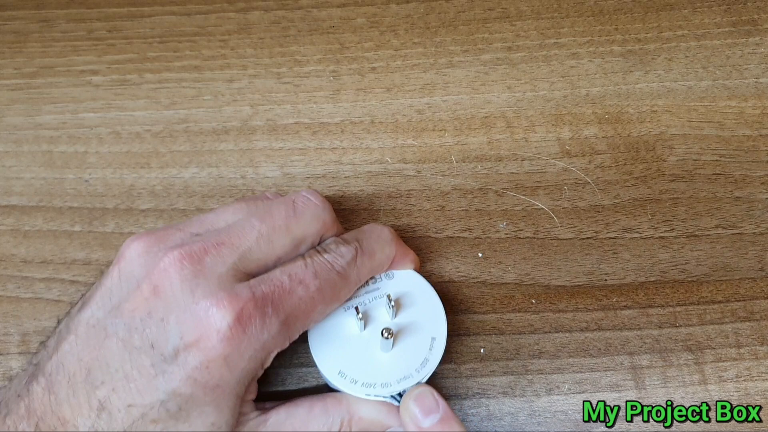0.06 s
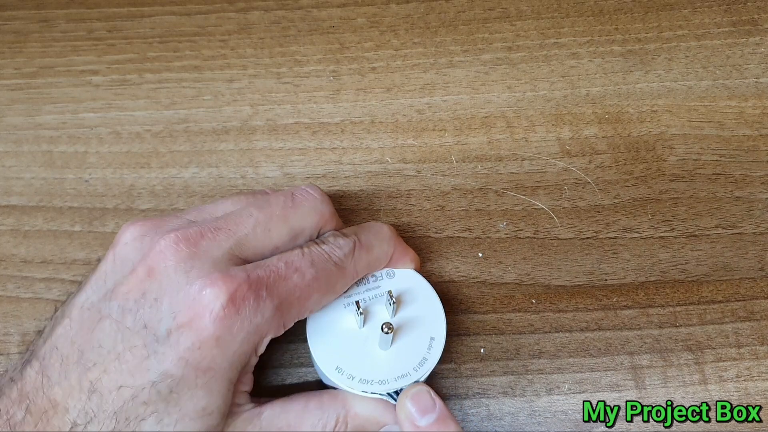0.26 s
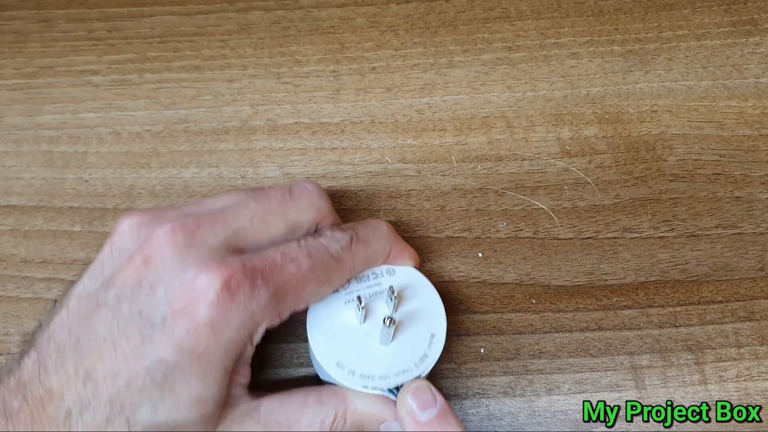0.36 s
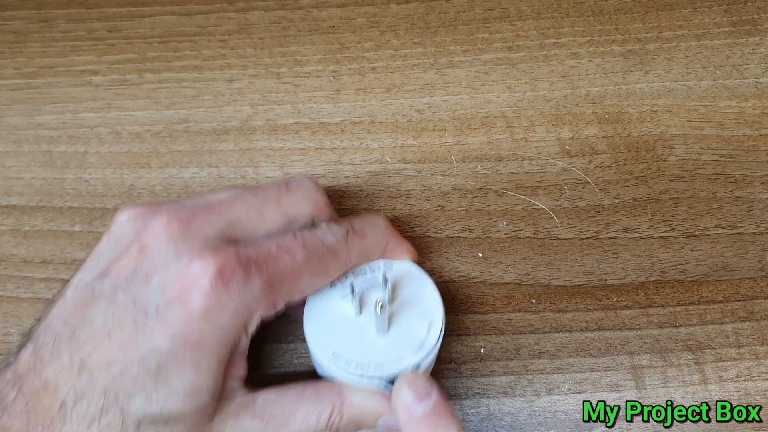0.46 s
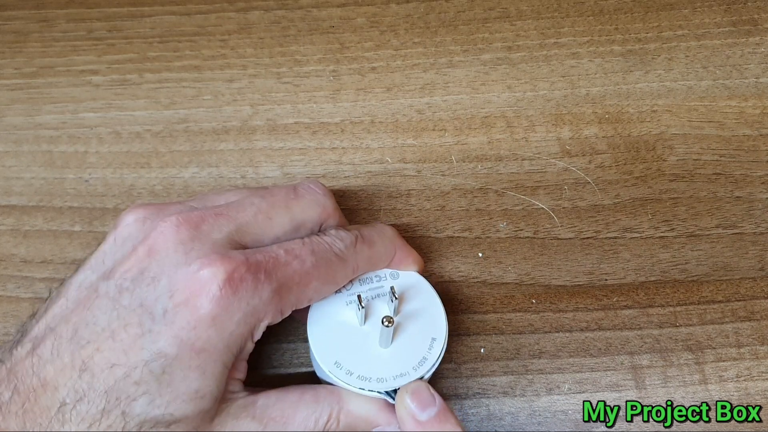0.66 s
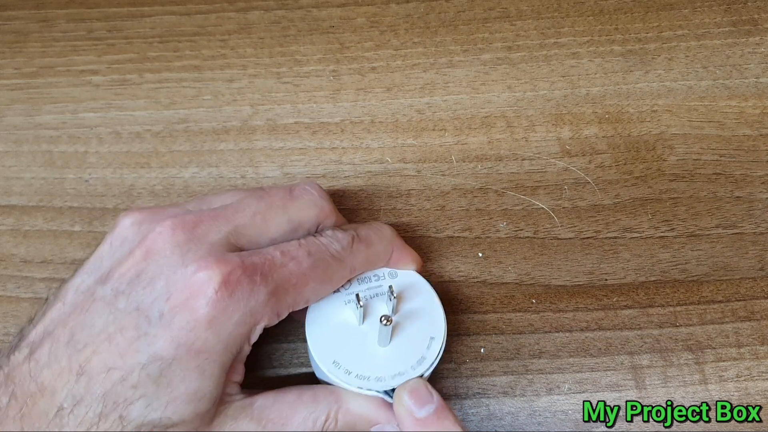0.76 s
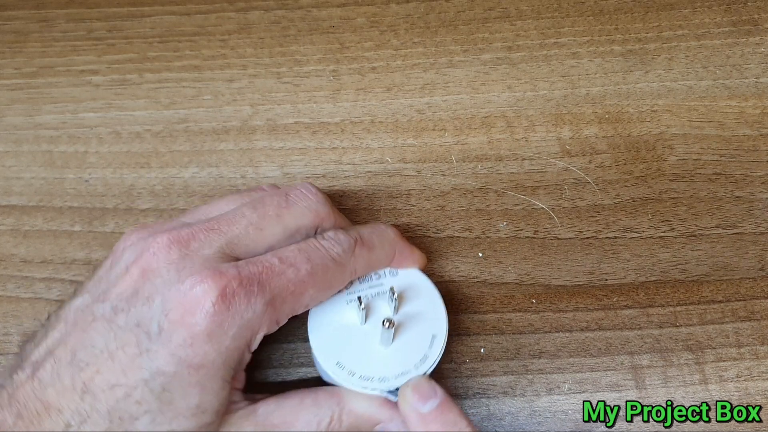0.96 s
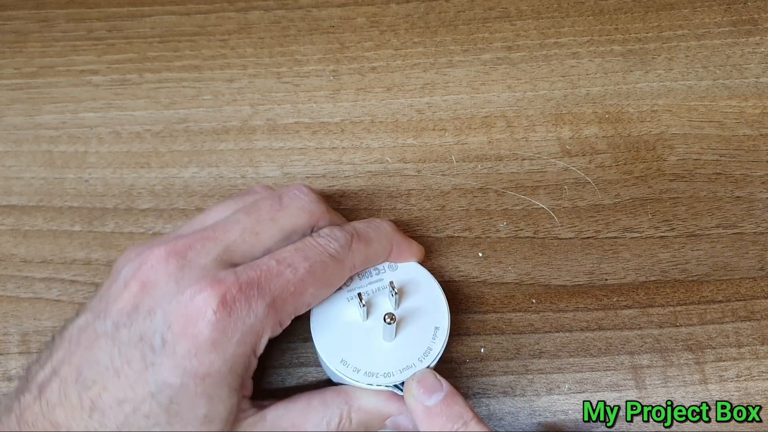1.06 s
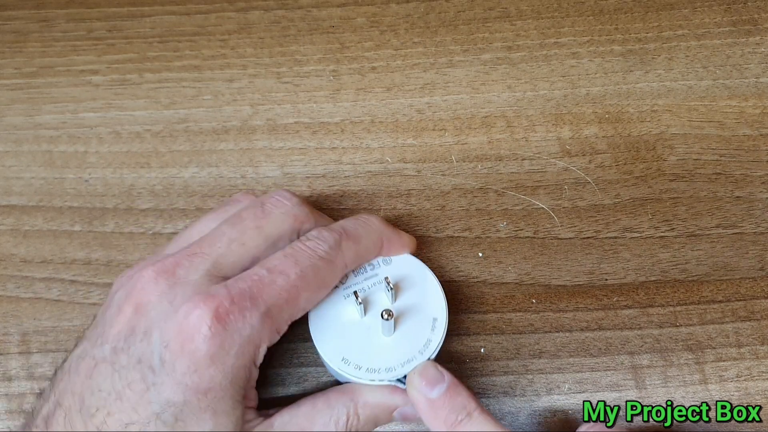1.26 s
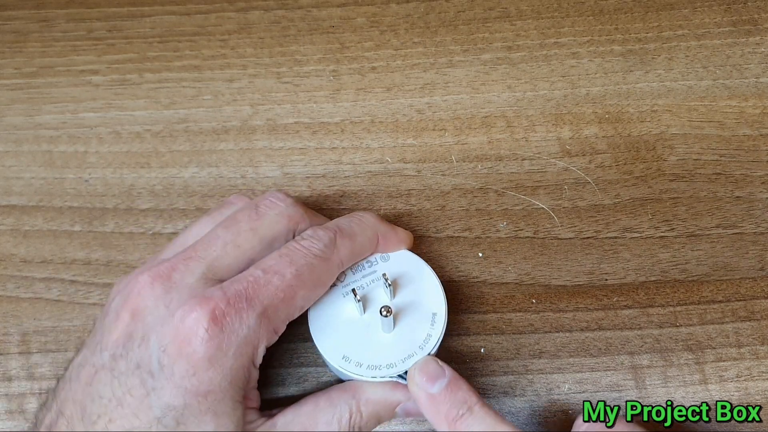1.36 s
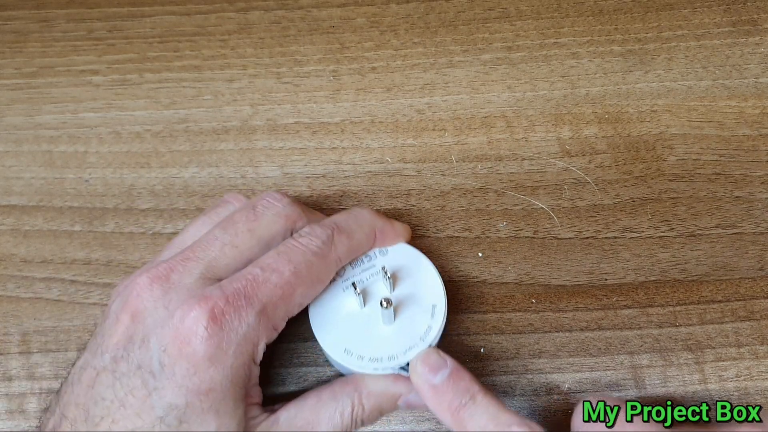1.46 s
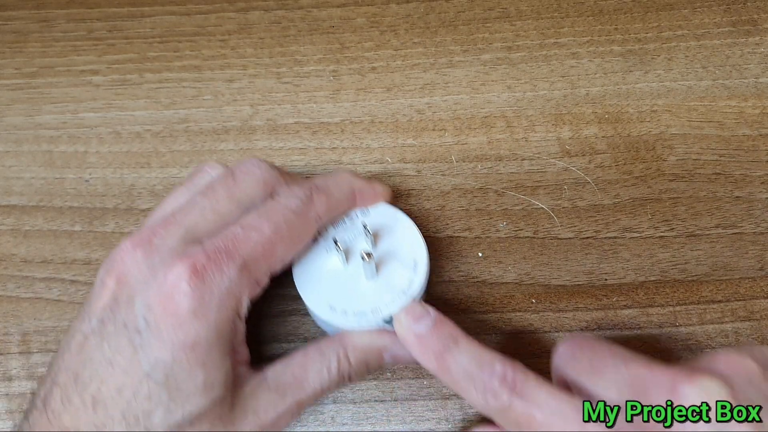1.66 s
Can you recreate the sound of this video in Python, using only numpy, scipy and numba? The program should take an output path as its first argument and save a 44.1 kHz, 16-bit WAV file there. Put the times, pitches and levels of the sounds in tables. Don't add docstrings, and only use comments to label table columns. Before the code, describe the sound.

Plastic clips snap loose with two loud, nearly merged cracks, followed by faint bumps and sliding on a table

```python
import sys
import numpy as np
from scipy import signal
from scipy.fft import rfft, irfft, next_fast_len
from scipy.io import wavfile
from scipy.ndimage import map_coordinates
from numba import njit

SR = 44100
rng = np.random.default_rng(int(sys.argv[2]) if len(sys.argv) > 2 else 0)


def amplitude_ratio(level_db):
    exponent = np.asarray(level_db, float) / 20
    return 10 ** exponent


def file_out(sig):
    cols = np.atleast_2d(sig).T
    lim = np.clip(cols, -1, 1)
    pcm = np.round(lim * 32767).astype(np.int16)
    wavfile.write(sys.argv[1], SR, pcm)


N = 74970
LEAD = SR // 2
M = N + LEAD

# start_s, peak_db, t60_s (time to fall 60 dB), shell_push_db
CRACKS = [
    (0.2028, -7.5, 0.0069, -14.5),
    (0.2184, -3.5, 0.0072, 2.5),
]
# pitch_hz, level_db (per Hz)
CRACK_COLOUR = [(180, -38.5), (320, 2.5), (550, -5.5), (900, 0), (1300, -1), (1800, -8), (4000, -2),
                (6410, -2.5), (10000, -8), (11500, -2.5), (16000, -26.5)]
# pitch_hz, width_hz, level_db
SHELL_MODES = [(152.7, 17, 2), (488, 34, -11.5), (599, 38, -0.5), (929, 13, 1), (1270, 30, -31.5),
               (1400, 54, -3)]
# pitch_hz, level_db, t60_s
TABLE_THUMP = [(42, -40, .5), (60, -38, .5), (155, -28, .16)]
# pitch_hz, level_db
EARLIER_COLOUR = [(100, -14), (600, -8), (1500, -5), (4000, -3.5), (9000, 3.5), (16000, -3.5)]
# start_s, peak_db, centre_hz, hardness_hz (dull above), rise_s
KNOCKS = [(0.121, -42.5, 168, 499, 0.012), (.464, -45, 190, 1400, 0.0027),
          (0.667, -58.5, 2555, 4600, .0003), (.672, -49, 300, 700, 0.0019), (.684, -59, 710, 1510, 0.0032),
          (0.6993, -35.5, 950, 3130, 0.00044), (.701, -40.5, 400, 810, .002),
          (0.713, -43.5, 420, 780, 0.0041), (0.718, -60, 1500, 2600, 0.00076),
          (0.771, -50.5, 1060, 3000, 0.00032), (.793, -65.5, 1150, 1800, .001),
          (0.831, -51, 237, 1010, 0.0011), (1.2015, -46.5, 650, 2000, .0005),
          (1.202, -36, 546, 935, 0.0035), (1.2023, -43, 200, 406, 0.0019), (1.217, -43, 462, 866, 0.0017),
          (1.24, -56.5, 603, 890, 0.0023), (1.338, -51, 830, 2529, 0.00082), (1.563, -46, 1100, 2766, .001),
          (1.569, -45.5, 728, 1800, 0.0024), (1.583, -56.5, 610, 1700, 0.0026),
          (1.599, -53.5, 720, 1820, 0.0016), (1.622, -58, 700, 1800, 0.0027)]
# pitch_hz, level_db, t60_s
CASE_MODES = [(160, -3, .09), (210, 1, 0.06), (320, -5, 0.05), (400, 0, 0.08), (470, -1, .07),
              (550, 1, 0.065), (640, -1, 0.05), (750, -3, .04), (960, 1, 0.022), (1180, -3, .02),
              (1420, -2, 0.028), (1980, -6, .022), (2500, -8, .016), (3200, -8, .015)]
# start_s, peak_db, pitch_hz
TICKS = [
    (.187, -50, 10000),
    (1.339, -47, 6700),
    (1.66, -59, 7950),
    (1.6612, -60, 11500),
    (1.664, -48, 12100),
    (1.6658, -58, 12400),
    (1.668, -51, 10140),
    (1.681, -61, 12650),
    (1.688, -70.5, 11000),
]
# time_s, level_db
DRAG_PRESSURE = [(1.05, -89.5), (1.12, -70), (1.25, -72), (1.33, -57.5), (1.368, -52), (1.421, -58.5),
                 (1.502, -72.5), (1.58, -58), (1.64, -63.5), (1.7, -66.5)]
# pitch_hz, level_db (per Hz)
DRAG_COLOUR = [(120, -26), (200, -6.5), (300, -11), (540, -3), (800, -7.5), (1400, -16), (1700, -26.5),
               (4000, -48)]
# time_s, level_db
PALM_PRESSURE = [(.64, -100), (.67, -74), (.8, -74), (1.08, -71), (1.28, -69), (1.38, -66), (1.48, -68.5),
                 (1.7, -71)]
# pitch_hz, level_db (per Hz)
PALM_COLOUR = [(150, -30), (300, -3), (700, -6), (1300, -4), (2000, -9), (3500, -15), (5000, -27),
               (8000, -50)]
# pitch_hz, level_db (per Hz)
FIZZ_COLOUR = [(2500, -18), (4500, -3.5), (7000, -5), (12000, -14.5), (15000, -34)]
SKID_LEVEL = [(1.657, -110), (1.661, -59), (1.669, -65), (1.676, -78), (1.7, -94)]
# pitch_hz, level_db (per Hz)
BLADE_COLOUR = [(4000, -42.5), (6500, -12), (10000, -4.5), (12500, 2), (14500, -8), (16000, -23)]
# pitch_hz, t60_s
ROOM_T60 = [(150, 0.35), (500, 0.27), (1200, 0.28), (3000, 0.31), (6000, 0.25), (12000, 0.25)]
# pitch_hz, level_db
ROOM_COLOUR = [(100, -3.5), (1000, 8.5), (4000, 2), (12000, 0.5)]
# pitch_hz, likeness (1 = the same, 0 = unrelated)
ALIKE = [(100, .97), (300, 0.95), (600, 0.65), (1100, 0.1), (2500, -.1), (10000, 0)]
# time_s, rumble_db
HAND_WEIGHT = [(0.0, -59), (0.052, -56.5), (0.188, -60.5), (0.222, -40), (0.41, -57), (0.43, -64.5),
               (0.776, -54.5), (0.814, -63), (0.87, -54.5), (1.026, -68), (1.116, -56.5), (1.154, -61.5),
               (1.528, -58), (1.7, -67.5)]
# pitch_hz, level_db (per Hz)
RUMBLE_COLOUR = [(12, -65.5), (20, -24.5), (70, -10), (114, -22.5), (130, -26), (211, -26.5), (500, -41),
                 (650, -67), (1100, -120)]
# pitch_hz, level_db (per Hz)
HISS_COLOUR = [(250, -40), (400, -5), (1000, -11), (4000, -20), (14000, -30), (16000, -32)]


def noise():
    return rng.standard_normal((2, M))


def unit(x):
    return x / np.sqrt(np.mean(x ** 2) + 1e-20)


def along(points, hz):
    f, v = np.transpose(points)
    return np.interp(np.log(hz + 1), np.log(f + 1), v)


def level(rows):
    s, db = np.transpose(rows)
    return amplitude_ratio(np.interp((np.arange(M) - LEAD) / SR, s, db, left=-120))


def filtered(x, response):
    size = next_fast_len(x.shape[-1] + SR // 2)
    spectrum = rfft(x, size) * response(np.fft.rfftfreq(size, 1 / SR))
    return irfft(spectrum, size)[..., :x.shape[-1]]


def causal(points):
    def response(hz):
        cepstrum = irfft(np.log(amplitude_ratio(np.maximum(along(points, hz), -70))))
        half = len(cepstrum) // 2
        cepstrum[1:half] *= 2
        cepstrum[half + 1:] = 0
        return np.exp(rfft(cepstrum))
    return response


def wobble(rate):
    knots = rng.standard_normal(int(M * rate / SR) + 4)
    return map_coordinates(knots, [np.arange(M) * rate / SR])


def pair(x, colour):
    def response(hz):
        turn = np.arccos(np.clip(along(ALIKE, hz), -1, 1)) / 2
        return amplitude_ratio(along(colour, hz)) * [np.cos(turn), np.sin(turn)]
    mid, side = filtered(x, response)
    return np.array([mid + side, mid - side])


def add(track, s, sound):
    at = LEAD + round(s * SR)
    track[..., at:at + sound.shape[-1]] += sound[..., :M - at]


def ring(modes, t):
    out = 0
    for k, (hz, db, t60) in enumerate(modes):
        fading = amplitude_ratio(db + rng.normal(0, 2.2) - 60 * t / t60)
        out = out + (-1) ** k * fading * np.sin(2 * np.pi * hz * rng.normal(1, 0.012) * t)
    return out


def shell_response(f):
    out = 0
    for k, (centre, width, db) in enumerate(SHELL_MODES):
        damping = 1j * f * width
        out = out + (-1) ** k * amplitude_ratio(db) * damping / (centre ** 2 - f ** 2 + damping)
    return out


def cracks():
    splinters_s, splinter_db = 0.0035, -4.5
    wide_hz = 550
    tear, kick, push = np.zeros((2, M)), np.zeros(M), np.zeros(M)
    t = np.arange(SR // 20) / SR
    for s, db, t60, push_db in CRACKS:
        for k, (early, weaker) in enumerate(rng.random((4, 2))):
            n = rng.standard_normal((3, len(t)))
            burst = (n[0] + n[1:]) * amplitude_ratio(-60 * t / t60)
            delay_s, extra_db = 0, 0
            if k > 0:
                delay_s = (k - early) / 3 * splinters_s
                extra_db = splinter_db - 2 * weaker
            add(tear, s + delay_s, amplitude_ratio(db - 2.5 + extra_db) * burst)
        add(kick, s, amplitude_ratio([db]))
        add(push, s, amplitude_ratio([db + push_db]))
    middle = tear.mean(0)
    tear = middle + filtered(tear - middle, lambda hz: (1j * hz / (wide_hz + 1j * hz)) ** 2)
    shell = filtered(amplitude_ratio(28) * push, shell_response)
    t = np.arange(SR // 2) / SR
    add(shell, CRACKS[-1][0], ring(TABLE_THUMP, t) * (1 - np.exp(-t / 0.0072)))
    crack = amplitude_ratio(6) * filtered(tear, causal(CRACK_COLOUR)) + shell
    blast = amplitude_ratio(23.5) * filtered(kick, causal(CRACK_COLOUR)) + shell
    return crack, blast


def earlier():
    start_s, level_db = -0.13, -21
    out = np.zeros(M)
    add(out, start_s, amplitude_ratio([level_db + 18]))
    return filtered(out, causal(EARLIER_COLOUR))


def knocks():
    spread_oct, ring_share, rattle_s = 1, 0.8, 0.0042
    puff_db, puff_t60 = 8.5, 0.012
    out, t = np.zeros(M), np.arange(SR // 4) / SR
    for s, db, centre_hz, hard_hz, rise_s in KNOCKS:
        near = []
        for hz, mode_db, t60 in CASE_MODES:
            octaves = np.log2(hz / centre_hz)
            near.append((hz, mode_db - 6 * (octaves / spread_oct) ** 2, t60))
        n = rng.standard_normal((2, len(t)))
        rattle = 0.013 * n[0] * np.exp(-t / rattle_s)
        rattle[0] = 1
        body = ring_share * signal.fftconvolve(ring(near, t), rattle)[:len(t)]
        puff = amplitude_ratio(puff_db - 60 * t / puff_t60) * n[1]
        rise = 1 - np.exp(-t / rise_s)
        dull = signal.butter(4, np.clip(hard_hz, 100, 15000), fs=SR, output="sos")
        add(out, s, amplitude_ratio(db - 1.5) * signal.sosfilt(dull, (body + puff) * rise))
    return out


def ticks():
    t60 = 0.002
    out, t = np.zeros(M), np.arange(400) / SR
    for s, db, hz in TICKS:
        click = np.sin(2 * np.pi * hz * t) + 0.4 * rng.standard_normal(len(t))
        add(out, s, amplitude_ratio(db - 60 * t / t60) * click)
    return out


def case_drag():
    grains_per_s, grain_db, shake_db = 490, 3, 1.5
    caught = rng.random((2, M)) < grains_per_s / SR
    grains = caught * amplitude_ratio(grain_db * noise()) * noise()
    bed = unit(pair(unit(grains) + 2.4 * noise(), DRAG_COLOUR))
    return bed * amplitude_ratio(shake_db * wobble(54)) * level(DRAG_PRESSURE)


def palm_slide():
    fizz_db, fizz_growth = -7, 2.2
    press = level(PALM_PRESSURE)
    brightening = (press / press.max()) ** (fizz_growth - 1)
    fizz = amplitude_ratio(fizz_db) * brightening * unit(pair(noise(), FIZZ_COLOUR))
    return (unit(pair(noise(), PALM_COLOUR)) + fizz) * press


def blade_skid():
    return unit(pair(noise(), BLADE_COLOUR) * amplitude_ratio(4 * wobble(900))) * level(SKID_LEVEL)


def room(x):
    wall_s, build_s = 0.003, 0.008
    hz, t, z = signal.stft(pair(rng.standard_normal((2, SR)), ROOM_COLOUR), SR, nperseg=256)
    fading = amplitude_ratio(-60 * t / along(ROOM_T60, hz)[:, None])
    tail = signal.istft(z * fading, SR, nperseg=256)[1]
    tail = tail * (1 - np.exp(-np.arange(tail.shape[1]) / SR / build_s))
    late = np.pad(x, (round(wall_s * SR), 0))[None]
    return signal.fftconvolve(late, tail / np.linalg.norm(tail[0]), axes=1)[:, :M]


def rumble():
    return amplitude_ratio(1) * level(HAND_WEIGHT) * unit(amplitude_ratio(2.3 * wobble(12)) * pair(noise(), RUMBLE_COLOUR))


def hiss():
    return amplitude_ratio(-84) * unit(amplitude_ratio(1.4 * wobble(1.7)) * pair(noise(), HISS_COLOUR))


def placed(x):
    lean_db, lag_s = 0.98, -0.000064
    gain, sign = amplitude_ratio([[lean_db], [-lean_db]]), np.array([[-1j], [1j]])
    return filtered(x, lambda hz: gain * np.exp(sign * np.pi * hz * lag_s))


def scene():
    crack, blast = cracks()
    knock, tick = knocks(), ticks()
    near = placed(crack + knock + tick)
    echo = amplitude_ratio(-3) * room(blast) + room(earlier()) + room(amplitude_ratio(-11) * knock + tick)
    rubbing = case_drag() + palm_slide() + blade_skid()
    return (near + echo + rubbing + rumble() + hiss())[:, LEAD:]


@njit
def held(over, keep):
    out = over.copy()
    for i in range(1, len(out)):
        out[i] = max(out[i], keep * out[i - 1])
    return out


def roll_off(x):
    return signal.sosfilt(signal.butter(12, 16820, fs=SR, output="sos"), x)


def record(dry):
    limit_db, ratio, release_s, smooth_s = -3.5, 0.76, 0.013, 0.0074
    tip, top_hz = 0.8, 16300
    over = np.maximum(20 * np.log10(np.abs(dry).max(0) + 1e-9) - limit_db, 0)
    duck_db = ratio * held(over, np.exp(-1 / (release_s * SR)))
    lag = 1 - np.exp(-1 / (smooth_s * SR))
    x = dry * amplitude_ratio(-signal.lfilter([lag], [1, lag - 1], duck_db))
    x = x / (1 + np.abs(x / tip) ** 4) ** 0.25
    mix = filtered(x, lambda hz: hz < top_hz)
    return roll_off(mix)


dry = scene()
out = record(dry)
file_out(out)
```